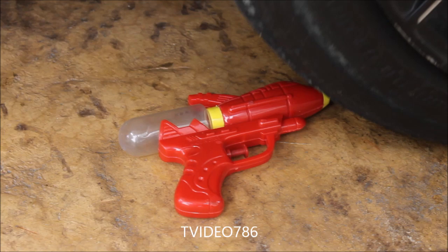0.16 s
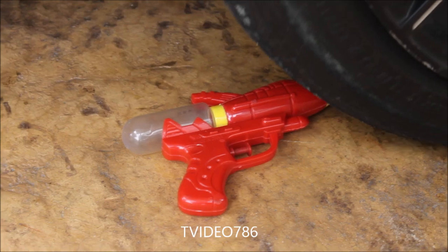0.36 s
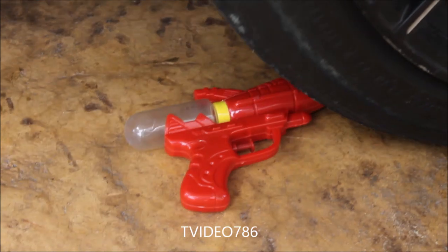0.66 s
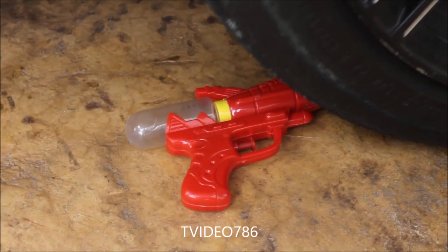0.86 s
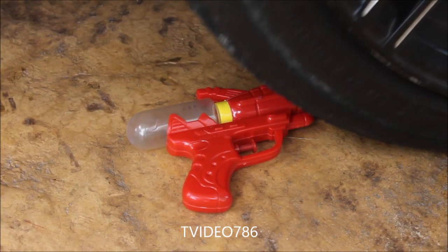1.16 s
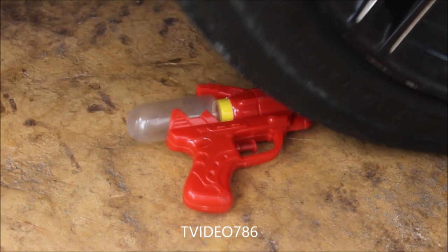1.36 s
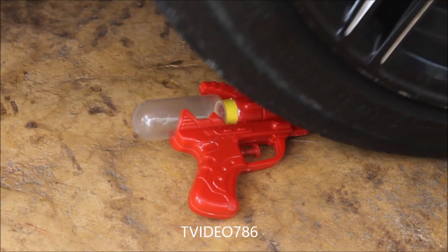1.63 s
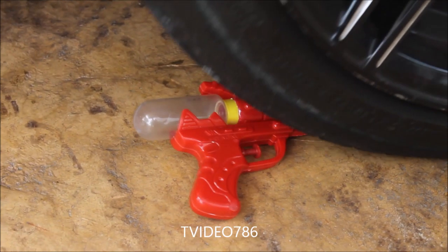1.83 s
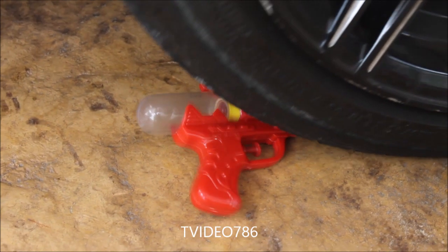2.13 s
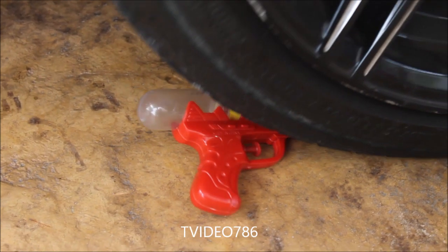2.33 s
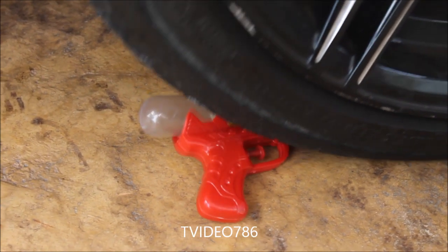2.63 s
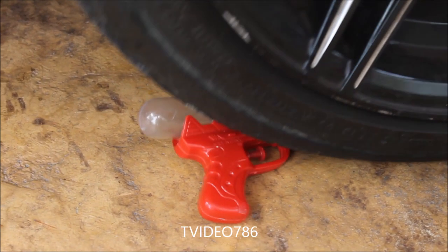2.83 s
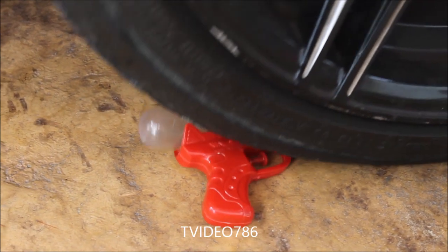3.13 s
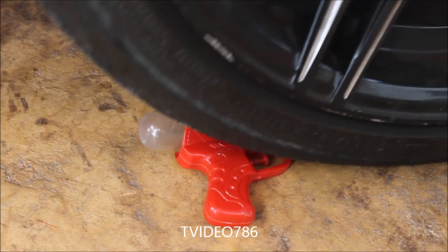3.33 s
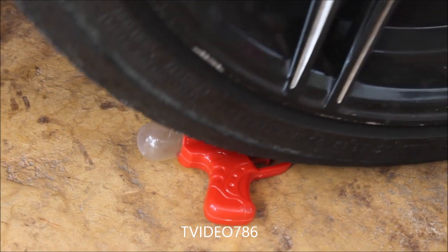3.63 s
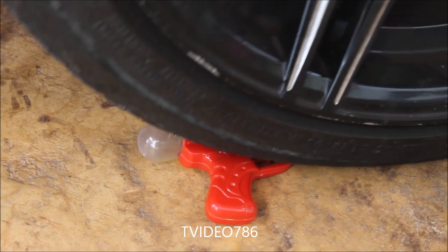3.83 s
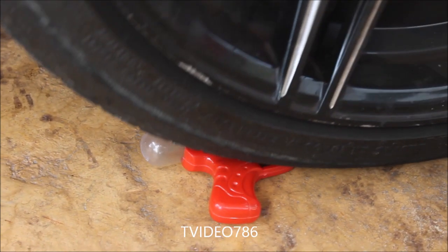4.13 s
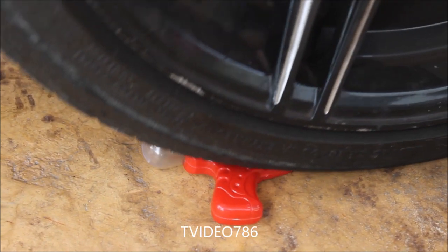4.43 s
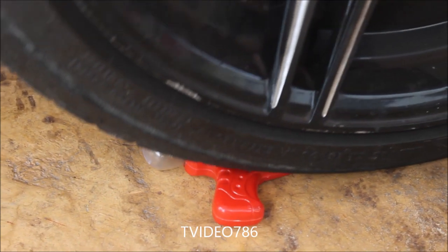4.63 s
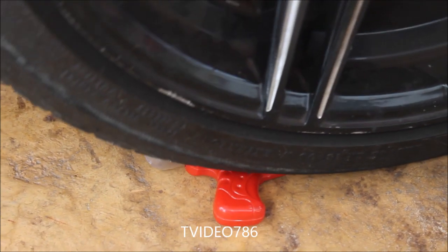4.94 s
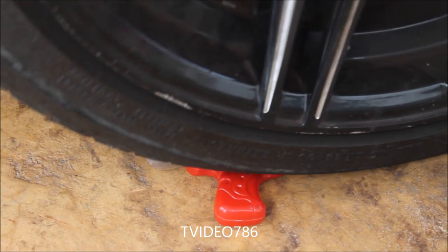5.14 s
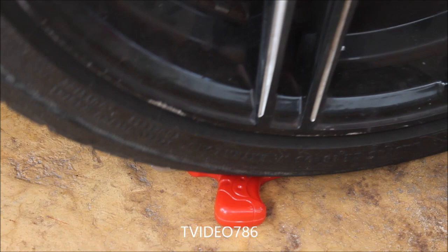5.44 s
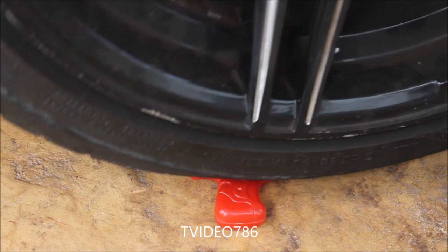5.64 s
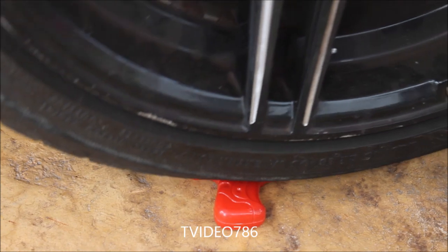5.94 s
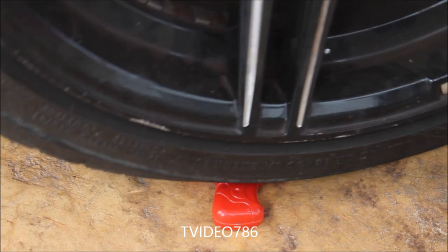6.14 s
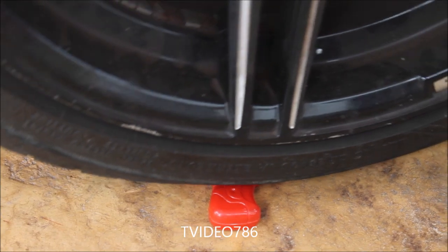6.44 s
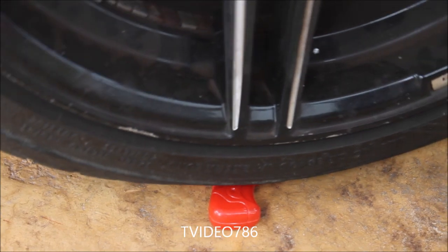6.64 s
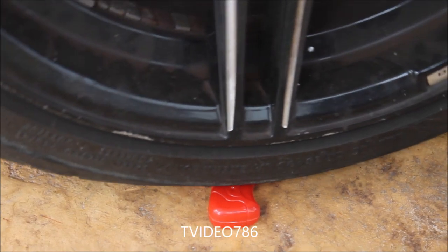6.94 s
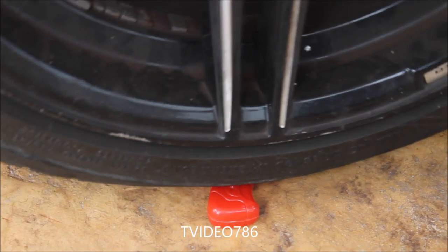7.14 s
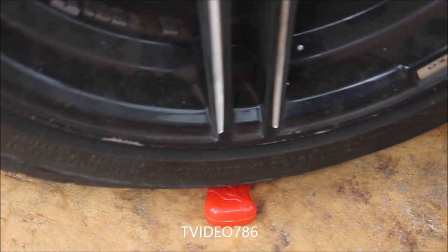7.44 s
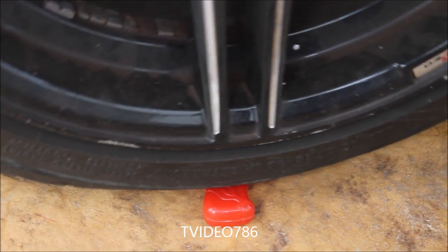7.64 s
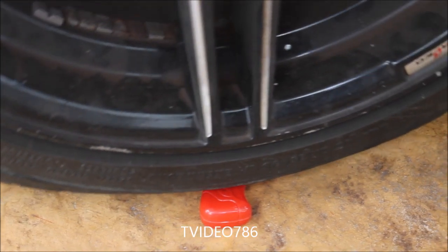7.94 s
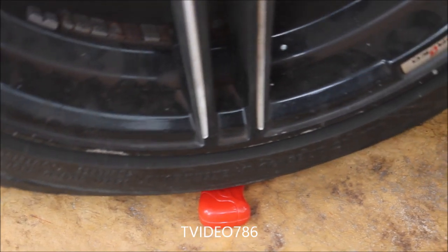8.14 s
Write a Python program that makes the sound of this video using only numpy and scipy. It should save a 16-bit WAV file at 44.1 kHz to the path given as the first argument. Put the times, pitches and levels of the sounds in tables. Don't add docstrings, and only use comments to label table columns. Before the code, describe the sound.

A dark, low engine rumble with a very faint whine runs alone until about 1.7 s. A few light ticks lead into an enormous, clipped hollow plastic crack at 2.0 s and another at 2.2 s, with crunchy crackle and a roomy garage ring. Smaller snaps follow to 2.8 s while the rumble drops sharply, nearly vanishing around 3.3 s. From 3.0 to 4.5 s many dry, hollow clacks come in irregular clusters, stronger near 4.1 s, as the rumble creeps back. From 4.55 to 5.8 s loud cracks return, the hardest at 4.76 s, with dense fine crackling and dull tyre thumps. After 5.9 s the snaps become sparse, smaller and brighter; a louder cluster with soft low thumps falls at 7.0-7.2 s, more at 7.4 and 7.6 s. Faint ticks and rumble remain until 8.3 s. Close, distorted microphone, slowed sound, dulled treble with brief dropouts.

```python
import sys
import numpy as np
from scipy import signal
from scipy.fft import rfft, irfft
from scipy.io import wavfile
from scipy.ndimage import uniform_filter1d

SR = 44100
rng = np.random.default_rng(int(sys.argv[2]) if len(sys.argv) > 2 else 0)


def magnitude_from_level(level_db):
    exponent = np.asarray(level_db, float) / 20
    return 10 ** exponent


def to_wav(sig):
    pcm = np.clip(np.atleast_2d(sig), -1, 1) * 32767
    pcm = np.round(pcm).astype(np.int16)
    wavfile.write(sys.argv[1], SR, pcm.T)


N = 365588

# (time [s], drone level [dB], garage ring level [dB])
GAIN = [(0.0, -23.5, 0), (1.66, -23.5, 13), (2.45, -25.5, -5.5), (2.75, -38.5, -12), (3.35, -42, 3),
        (3.79, -33, 1), (4.3, -29.5, -1), (4.7, -20.5, -2), (4.94, -23, -6), (5.08, -26.5, -12),
        (5.45, -27, -15), (5.65, -33.5, -4), (5.85, -28, -8.5), (6.4, -23.5, 2.5), (7.05, -25, 0.5),
        (7.27, -23.5, -8.5), (7.6, -27, 0.5), (8.29, -24.5, 3)]
# (frequency [Hz], level [dB])
EDGE = [(150, -4.5), (500, 4.5), (1200, 8.5), (2500, -0.5), (4000, -7), (6000, -18.5)]
# (frequency [Hz], width [Hz], level [dB])
WHINE = [(2920, 53, -41.5), (3690, 100, -37.5)]


def evened(x):
    return x / np.sqrt(np.mean(x ** 2) + 1e-20)


def peaked(x):
    return x / abs(x).max()


def read(points, hz):
    f, value = np.transpose(points)
    return np.interp(np.log(hz + 1), np.log(f + 1), value)


def coloured(x, points):
    hz = np.fft.rfftfreq(len(x), 1 / SR)
    return irfft(rfft(x) * magnitude_from_level(read(points, hz)), len(x))


def resonate(x, hz, width_hz):
    r = np.exp(-np.pi * width_hz / SR)
    return signal.lfilter([1, 0, -r], [1, -2 * r * np.cos(2 * np.pi * hz / SR), r * r], x)


def control(table, column):
    rows = np.array(table)
    return magnitude_from_level(np.interp(np.arange(N) / SR, rows[:, 0], rows[:, column]))


def add(mix, s, sound):
    part = mix[round(s * SR):][:len(sound)]
    part += sound[:len(part)]


def snap(row, noise):
    # (time [s], brightness near [dB],
    # brightness in the garage [dB], rim ring [Hz], tearing time [ms])
    flatten = [
        (2.0, 2, -10, 2395, 4.9),
        (2.7, 5.5, 3, 2020, 5.2),
        (3.4, 0, -9.5, 1944, 6.7),
        (4.5, 6, -1, 1944, 3.3),
        (5.3, 8, 6, 2960, 1.52),
        (6.2, 6.5, -18.5, 3080, 3.95),
        (7.0, 12.5, 29.5, 3530, 2.4),
        (7.6, 8.5, -10, 3140, 3.7),
    ]
    rim_spread, tear_spread = 0.12, 0.25
    focus = 1.9
    s, peak_db, shell_hz, share_db = row
    times, *state = np.transpose(flatten)
    bright_db, airy_db, rim_hz, tear_ms = (np.interp(s, times, column) for column in state)
    rim_hz = max(rim_hz * np.exp(rim_spread * np.tanh(noise[-1])), min(0.82 * shell_hz, 3600))
    tear_ms = tear_ms * np.exp(tear_spread * noise[-2])

    t = np.arange(len(noise)) / SR
    tear = np.clip(t / 0.0005, 0, 1) * np.exp(-(t / (0.001 * max(tear_ms, 0.3))) ** 1.7)
    lumps = uniform_filter1d(noise[::-1] ** 4, size=50) / 3
    chatter = lumps * np.exp(-t / (0.003 * max(tear_ms, 1)))
    shape = tear + 0.2 / max(1, magnitude_from_level(0.28 * peak_db)) * chatter

    rattle = noise * shape
    shell = peaked(resonate(rattle, shell_hz, 0.15 * shell_hz))
    rim = peaked(resonate(rattle, rim_hz, 0.15 * rim_hz))
    edge = 0.9 * peaked(coloured(noise, EDGE) * shape)
    bright = magnitude_from_level(bright_db) * min(1, 1300 / shell_hz) ** focus
    near = peaked(shell + bright * (0.25 * rim + edge))

    click, airy = signal.unit_impulse(len(t), 200), magnitude_from_level(airy_db)
    wide_shell = evened(resonate(click, shell_hz, 0.17 * shell_hz))
    wide_rim = evened(resonate(click, rim_hz, 0.25 * rim_hz))
    wide = evened(wide_shell + 0.25 * airy * wide_rim)
    wide = evened(wide + 3.15 * airy * evened(coloured(click, EDGE)))
    return magnitude_from_level(peak_db) * near, magnitude_from_level(peak_db + share_db - 14) * wide


def crackle():
    # (time [s], crackle level [dB])
    crunch = [(1.75, -50.5), (2.0, -47), (2.16, -27), (2.53, -24.5), (2.8, -33), (3.2, -41.5),
              (3.45, -43.5), (4.01, -33), (4.41, -58.5), (4.69, -32.5), (4.95, -15), (5.49, -14.5),
              (5.61, -31.5), (6.2, -23.5), (6.34, -74.5), (7.01, -50.5), (7.6, -26), (8.0, -50)]
    out, t = np.zeros(N), np.arange(500) / SR
    for hz in np.geomspace(700, 5000, num=10):
        size_db = 5.0 * np.minimum(rng.exponential(size=N), 3)
        clicks = (rng.random(N) < 14 / SR) * magnitude_from_level(size_db)
        ring = np.sin(2 * np.pi * hz * t) + 0.5 * rng.standard_normal(len(t))
        grain = np.exp(-t / 0.0011) * ring
        out += signal.oaconvolve(clicks, grain * magnitude_from_level(read(EDGE, hz)))[:N]
    time = np.arange(N) / SR
    loaded = (time > crunch[0][0]) & (time < crunch[-1][0])
    return evened(out) * control(crunch, column=1) * loaded * magnitude_from_level(-18.0)


def thump(row, noise):
    s, peak_db, hz, share_db = row
    t = np.arange(len(noise)) / SR
    t = np.maximum(t - 0.002, 0)
    blow = t / 0.0008 * np.exp(-t / 0.00024)
    ring = peaked(resonate(blow, hz, 0.5 * hz))
    grit = peaked(resonate(noise * (t > 0) * np.exp(-t / 0.0044), 2.32 * hz, 420))
    boom = 0.17 * peaked(resonate(blow, 121.8, 17))
    near = magnitude_from_level(peak_db) * peaked(ring + 0.97 * grit + boom)
    return near, magnitude_from_level(share_db + 11.0) * near


def garage(x, decays):
    lumps_db = 4.5
    out, turn = np.zeros(N), np.arange(N) / SR * 7.3
    for k in range(3):
        hz, t, z = signal.stft(rng.standard_normal(SR * 3 // 2), SR, nperseg=256)
        clumps = uniform_filter1d(rng.standard_normal(z.shape), size=4, axis=0)
        clumps = evened(uniform_filter1d(clumps, size=3, axis=1))
        fade_db = 60 * t / read(decays, hz)[:, None]
        tail = signal.istft(z * magnitude_from_level(lumps_db * clumps - fade_db), SR, nperseg=256)[1]
        tail *= np.clip(np.arange(len(tail)) / SR / 0.0029, 0, 1)
        fed = x * np.cos(2 * np.pi * (turn + k / 3)) * np.sqrt(2 / 3)
        out += signal.fftconvolve(fed, tail / np.linalg.norm(tail))[:N]
    return out


def drone():
    # (frequency [Hz], level per Hz [dB])
    rumble_colour = [(12, -35.5), (20, 5), (48, 0), (174, -7), (371, -8.5), (408, -10.5), (517, -14),
                     (656, -11.5), (721, -16.5), (775, -11), (1220, -21.5), (2860, -38.5), (5830, -53),
                     (7580, -71), (12800, -120)]
    frames, hz = N // 512 + 5, np.fft.rfftfreq(2048, 1 / SR)
    a, b, patches = rng.standard_normal((frames, 1025, 3)).T
    patches = uniform_filter1d(patches, size=14, axis=0)
    patches = evened(uniform_filter1d(patches, size=8, axis=1))
    z = (a + 1j * b) * magnitude_from_level(read(rumble_colour, hz)[:, None] + 1.3 * patches)
    rumble = evened(signal.istft(z, nperseg=2048, noverlap=1536)[1][:N])
    whine = sum(magnitude_from_level(db) * evened(resonate(rng.standard_normal(N), f, w)) for f, w, db in WHINE)
    return (rumble + whine) * control(GAIN, column=1) * magnitude_from_level(1.0)


def scene():
    # (time [s], peak [dB], shell ring [Hz], garage share [dB])
    shell_snaps = [(1.727, -24, 820, -11), (1.8028, -16, 1545, -12.5), (1.8932, -16, 930, -10),
                   (1.9826, 27.5, 935, -25.5), (1.9886, 10.5, 904, -13.5), (2.0609, 7, 890, -11),
                   (2.2151, 27, 870, -19), (2.308, -2, 976, -8.5), (2.3682, 16.5, 860, -11.5),
                   (2.4819, -8.5, 845, -6), (2.5303, 11.5, 1650, -4.5), (2.5973, -1.5, 1640, -14.5),
                   (2.6067, 1, 1296, -20.5), (2.6205, 4, 1007, 0), (2.6523, -7.5, 1115, -18.5),
                   (2.6854, 1.5, 1520, -11), (2.724, -6.5, 1710, -12.5), (2.805, 1.5, 1366, -7.5),
                   (2.825, -12.5, 1580, -19.5), (2.8376, -7.5, 1070, -18),
                   (3.033, 2.5, 1486, -39), (3.0441, -4.5, 870, -14), (3.0554, 4, 920, -10),
            (3.1516, -1.5, 1076, -7.5), (3.1653, 3.5, 1000, -18), (3.2287, 0, 670, -25.5),
            (3.2672, -6, 1120, -15), (3.2767, -5, 1600, -17), (3.311, -4.5, 1110, -11.5),
            (3.3508, -5, 760, -20), (3.4281, -17, 790, 0), (3.4837, -6, 1130, -13.5),
            (3.5069, -3, 1420, -9), (3.5225, 1.5, 1020, -15.5), (3.5431, -3.5, 1515, -18.5),
            (3.5653, 1.5, 1053, -16), (3.6105, -1, 1290, -16), (3.774, -14.5, 777, 3),
            (3.8206, 1.5, 1080, -24.5), (3.861, -7, 1610, -17), (3.8886, -7, 1536, -18.5),
            (3.9088, -11, 796, 1.5), (4.0389, 2.5, 1185, -22), (4.0456, 0.5, 1065, -6),
            (4.0684, 8, 1245, -9), (4.1134, 5.5, 1086, -12.5), (4.1955, 3.5, 1090, -30.5),
            (4.3266, -5, 1575, -8), (4.427, -5, 993, -5.5), (4.488, -2, 1600, -5),
                   (4.5508, 13.5, 920, -13), (4.579, 5, 1130, -16), (4.5916, 2, 2300, -9),
             (4.6777, 13.5, 1135, -30.5), (4.745, -3, 1224, -25.5), (4.7628, 23, 1018, -20),
             (4.7976, 5.5, 1600, -5), (4.844, -1.5, 1000, -28.5), (4.872, -4, 1004, -4),
             (4.9069, -5, 1027, -32), (5.0109, 16, 1160, -9), (5.0363, 5.5, 1504, -16.5),
             (5.1278, 4.5, 1173, 1), (5.1811, 17, 1347, -10), (5.357, 5, 2070, -38),
             (5.402, -5.5, 1010, -17.5), (5.44, 8, 2150, -17.5), (5.4906, 13.5, 1330, -20),
             (5.5262, -5, 3200, -15), (5.5406, 0, 1530, -30), (5.6185, 11.5, 1023, -6.5),
             (5.6248, 10, 1536, -15), (5.6545, -5, 955, -8), (5.7155, 15.5, 978, -15),
             (5.7486, -1.5, 765, -10), (5.789, -3, 2430, -13.5), (5.8539, -14.5, 670, -7),
                   (5.9215, 4.5, 1970, -17), (5.9542, -10.5, 4150, -7.5), (6.0701, 6.5, 1970, -19),
            (6.1188, -6, 2290, -19), (6.2119, -4.5, 3670, -24.5), (6.3546, -13, 960, -31.5),
            (6.5164, 2, 2250, -15), (6.558, -14, 1226, -11), (6.605, -20, 3400, -20),
            (6.6292, -11.5, 1010, -31.5), (6.9274, -2, 2470, -20.5), (7.0381, 3, 2380, -12),
            (7.0445, 0.5, 1124, -11.5), (7.0669, 11.5, 2480, -18.5), (7.1, -17.5, 4500, -6),
            (7.1678, -0.5, 936, -14), (7.2505, -2.5, 2160, -21), (7.3266, -21.5, 730, -2),
            (7.344, -13.5, 1650, 3.5), (7.4376, 2, 2020, -18), (7.589, -10, 3260, -19.5),
            (7.6242, 6, 3030, -22.5), (7.7747, -16.5, 647, -10), (7.9777, -18, 895, -14)]
    # (time [s], peak [dB], ring [Hz], garage share [dB])
    thumps = [(2.533, -3.5, 217, -26.5), (3.344, -11.5, 85, -13.5), (3.49, -14, 68, -11.5),
              (4.467, -16, 78, 1), (4.761, 0, 220, -2.5), (4.881, -13.5, 229, 3.5), (5.402, -3, 536, -6.5),
              (5.486, -3, 458, -6.5), (5.617, 3, 111, -11), (6.515, -3.5, 123.5, -10.5),
              (7.037, 2, 123.7, -4.5), (7.134, 4.5, 245, -1.5), (7.169, 8, 284, -11.5),
              (7.231, -17.5, 290, -13.5), (7.436, 7, 242, -21)]
    # (frequency [Hz], time to fade by 60 dB [s])
    under_car = [(200, 0.37), (1000, 0.11), (5000, 0.1)]
    # (frequency [Hz], time to fade by 60 dB [s])
    garage_fade = [(80, 0.11), (300, 2.29), (900, 1.29), (2000, 1.04), (4000, 1.01), (6000, 0.79)]

    background, near = drone(), crackle()
    sent = near * magnitude_from_level(17.5)
    snaps = shell_snaps
    noises = rng.standard_normal((200, 4096))
    sounds = [thump(row, noises[-1 - k]) for k, row in enumerate(thumps)]
    sounds += [snap(row, noises[k]) for k, row in enumerate(snaps)]
    for row, (direct, spread) in zip(thumps + snaps, sounds):
        add(near, row[0] + 0.0003, direct)
        add(sent, row[0], spread)
    car_ring = garage(1.65 * np.tanh(near / 1.57), under_car) * magnitude_from_level(-13.0)
    garage_ring = garage(sent, garage_fade) * control(GAIN, column=2) * magnitude_from_level(-2.0)
    return (near + car_ring + garage_ring + background)[None]


def starved(x):
    # (time [s], length [ms], lowest frequency [Hz])
    dropouts = [(.168, 10, 4100), (.209, 11, 3100), (.274, 12, 3000), (.378, 12, 3000), (.807, 13, 3300),
                (1.062, 12, 3100), (1.17, 14, 3300), (1.448, 32, 2600), (1.576, 11, 2750), (1.64, 16, 3900),
                (2.191, 19, 4350), (2.3, 14, 3100), (3.09, 9, 3000), (3.73, 19, 3100), (3.795, 14, 3200),
                (4.243, 32, 2400), (5.821, 11, 3900), (6.474, 24, 4200), (7.124, 13, 2250),
                (7.398, 13, 3900), (8.017, 53, 2850), (8.166, 33, 2250)]
    hz, t, z = signal.stft(x, SR, nperseg=256, noverlap=192)
    weak = np.all([abs(hz - f) > 90 for f, _, _ in WHINE], axis=0)
    for s, ms, low_hz in dropouts:
        chosen = rng.random(len(hz)) < (hz - low_hz + 1200) / 2000
        band = weak & (hz > low_hz - 900) & chosen
        moment = (t > s + 0.001) & (t < s - 0.002 + ms / 1000)
        z[..., band[:, None] & moment] *= 0.02
    return signal.istft(z, SR, nperseg=256, noverlap=192)[1][:, :N]


def limited(x, knee_db=-11, share=0.3, recovery_db=150):
    power_db = 10 * np.log10(abs(uniform_filter1d(x[0] ** 2, size=200)) + 1e-12)
    fall = np.arange(N) * recovery_db / SR
    held_db = np.maximum.accumulate(power_db + fall) - fall
    over_db = np.maximum(held_db - knee_db, 0)
    late_db = uniform_filter1d(over_db, size=301, origin=150)
    return x / magnitude_from_level(share * late_db)


def roll_off(x):
    return signal.sosfilt(signal.butter(12, 5980, fs=SR, output="sos"), x)


def record(dry):
    # (frequency [Hz], level [dB])
    output_colour = [(5800, 1.5), (6400, -11), (7500, -3), (9000, 14.5), (10800, 11), (11500, -12.5),
                     (15300, 1), (16000, -28), (22000, -60)]
    bass_cut = signal.butter(N=4, Wn=43, btype="high", fs=SR, output="sos")
    steady = signal.sosfilt(bass_cut, dry)
    treble_cut = signal.firwin(301, 5940, window=("kaiser", 9), fs=SR)
    dull = signal.oaconvolve(steady, treble_cut[None], "same")
    clipped = np.clip(limited(starved(dull)), -0.865, 0.865)
    hz = np.linspace(0, SR / 2, num=200)
    last_filter = signal.firwin2(301, hz, magnitude_from_level(read(output_colour, hz)), fs=SR)
    wide = signal.oaconvolve(clipped, last_filter[None], "same")
    return roll_off(wide)


dry = scene()
out = record(dry)
to_wav(out)
```